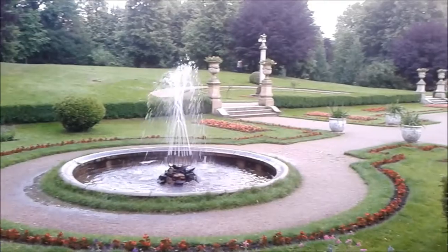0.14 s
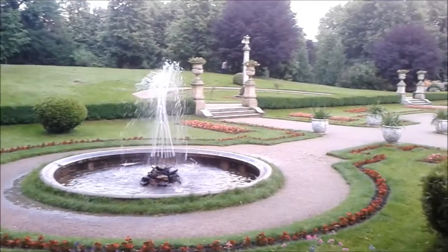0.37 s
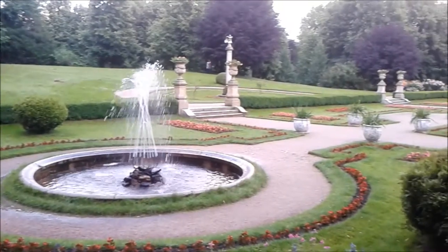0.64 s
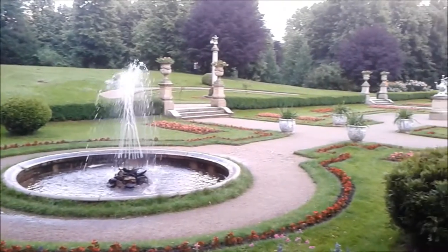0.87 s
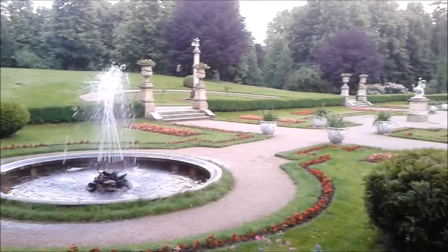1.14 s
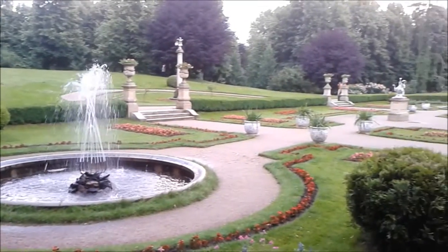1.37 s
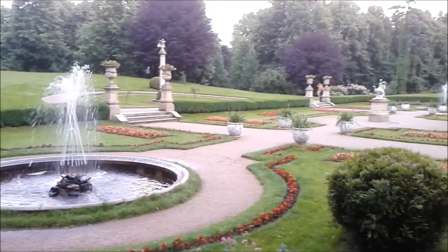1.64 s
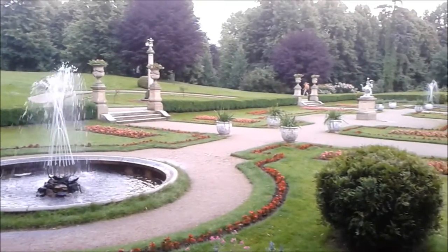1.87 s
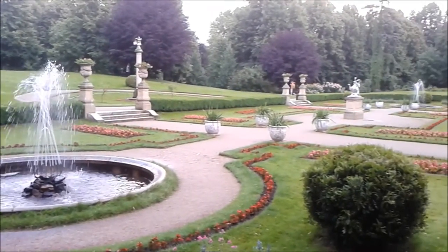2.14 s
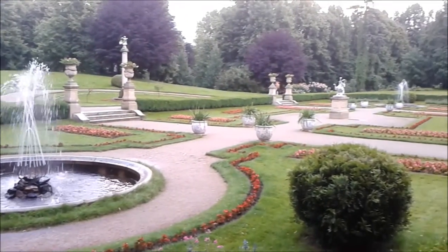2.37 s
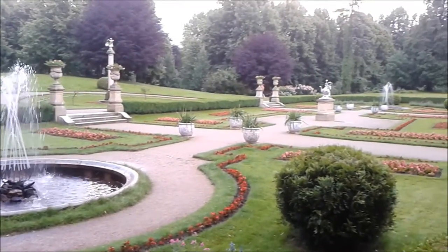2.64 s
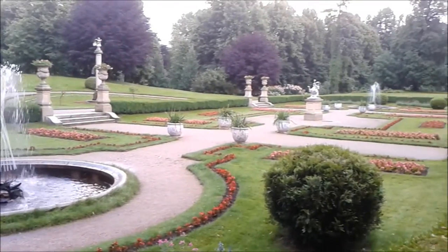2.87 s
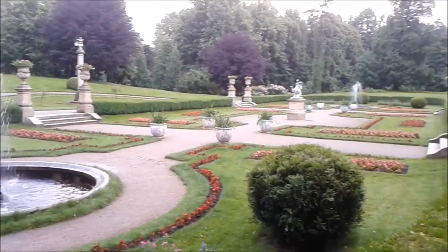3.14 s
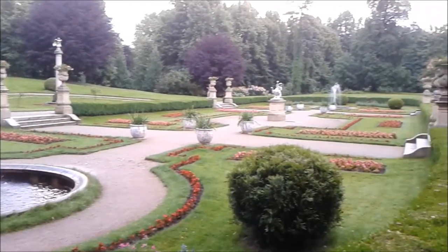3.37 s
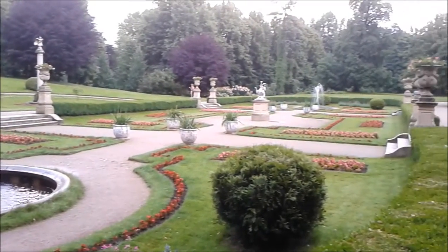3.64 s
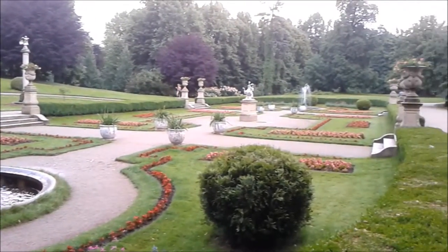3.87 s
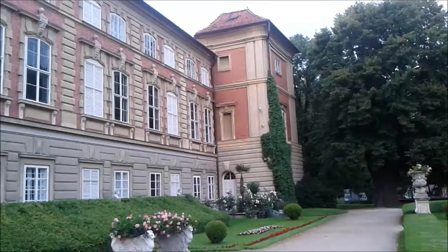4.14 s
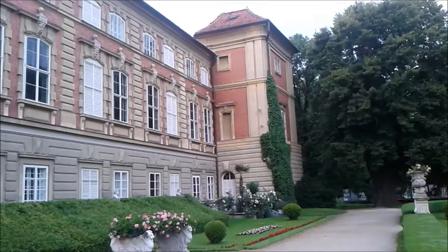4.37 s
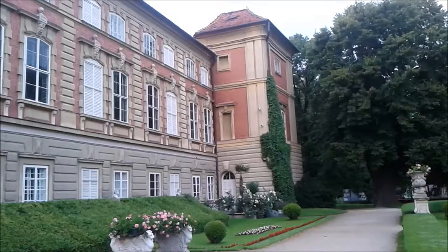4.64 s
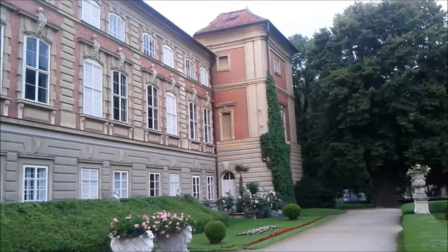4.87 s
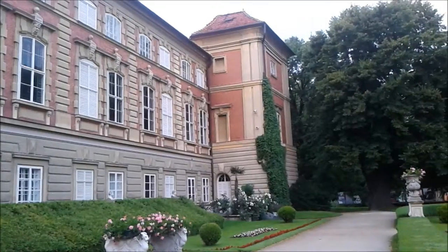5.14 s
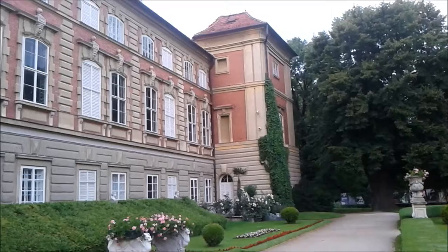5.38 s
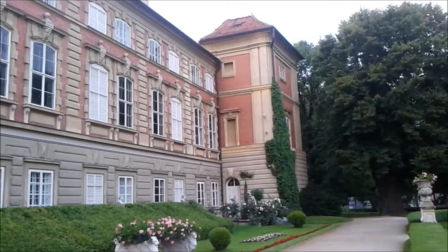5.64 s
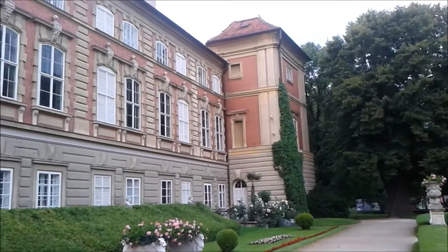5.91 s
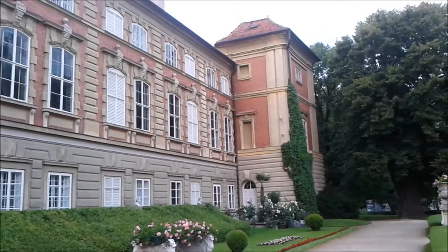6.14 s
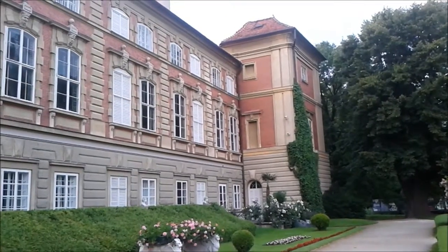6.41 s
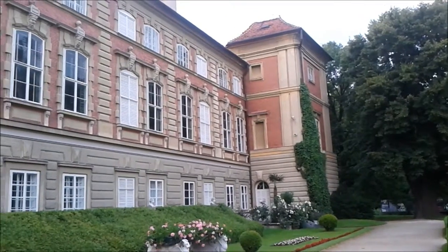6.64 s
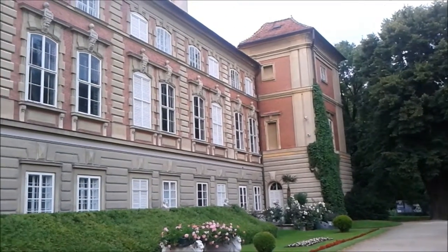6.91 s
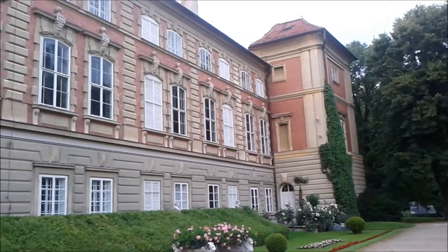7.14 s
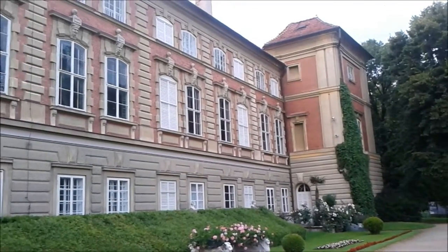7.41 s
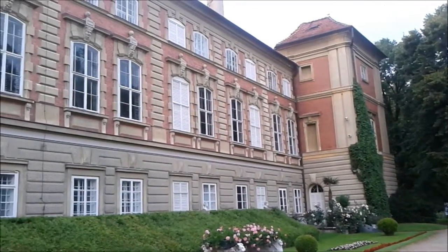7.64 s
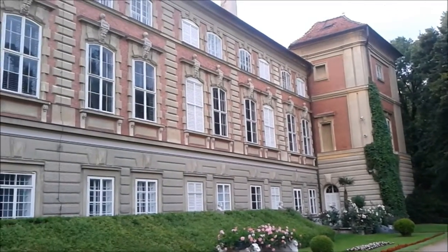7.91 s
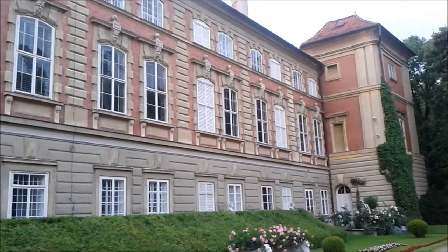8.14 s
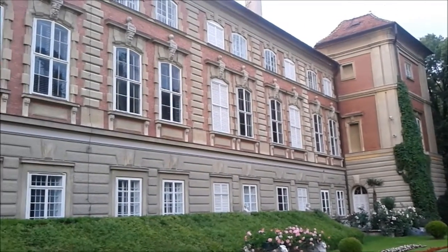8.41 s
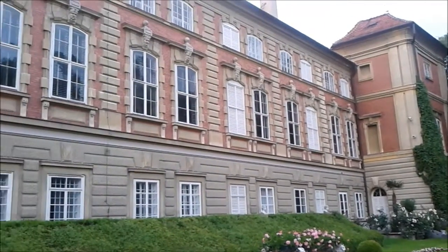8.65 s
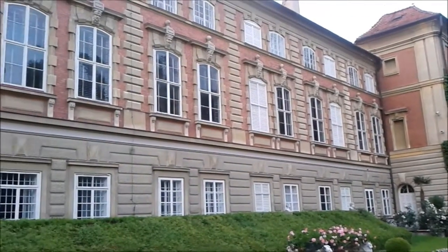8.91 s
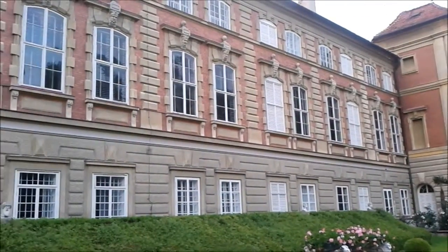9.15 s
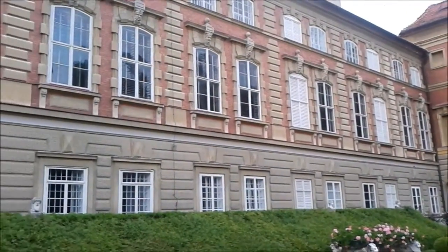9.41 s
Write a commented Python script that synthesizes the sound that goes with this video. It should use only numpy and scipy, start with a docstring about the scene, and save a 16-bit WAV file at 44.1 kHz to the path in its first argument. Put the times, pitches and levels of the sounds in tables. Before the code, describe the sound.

Close, busy fountain water hisses, plops and slaps, cuts abruptly to silence, then returns much fainter and farther away in a quiet park.

```python
"""A fountain jet falls back into its stone basin in a park. First it is heard from near while the
microphone turns away: noise for the hiss, damped sines for drops, plops, splashes and low glugs, and a few
soft hoots from wavering sines. After a short silence it is heard from far off beside a house wall: softer,
without the random stray plops, with one more hoot. A low rumble of filtered noise lies under both parts."""
import sys
import numpy as np
from scipy import signal
from scipy.fft import rfft, irfft
from scipy.io import wavfile
from scipy.ndimage import uniform_filter1d, map_coordinates

SR = 44100
rng = np.random.default_rng(int(sys.argv[2]) if len(sys.argv) > 2 else 0)


def store_wav(level_fs):
    """Save 16-bit WAV to argv[1]."""
    pcm = np.round(np.clip(np.atleast_2d(level_fs), -1, 1) * 32767)
    wavfile.write(sys.argv[1], SR, pcm.T.astype(np.int16))


def gain_from_decibels(decibels):
    """Convert decibel values to linear amplitude factors."""
    exponent = np.asarray(decibels, float) / 20
    return 10 ** exponent


N = 420273

# The near part, then the far part. Each row: start in seconds, end in seconds.
PARTS = [(0, 4.2408), (4.4381, 8.8597)]
# How far the microphone is turned away. Each row: time in seconds, turn from 0 (facing) to 1 (away).
TURN = [(0, 0), (1, 0.26), (2, 0.51), (3, 0.81), (4.24, 0.94), (4.44, 0.4), (6, 0.34), (7.5, 0.31),
        (8.1, 0.6), (8.86, 0.86)]
# Loudness of the steady fall, near and far. Each row: time in seconds, level in dB.
NEAR_LEVEL = [(0.1, -26.5), (0.41, -26), (0.53, -26.5), (0.91, -27), (1.04, -26), (1.51, -27), (2.18, -26),
              (2.57, -28), (2.85, -26), (3.71, -27), (4.05, -28), (4.24, -27)]
FAR_LEVEL = [(4.44, -36.5), (4.96, -36.5), (5.47, -35.5), (7.86, -37.5), (8.26, -37), (8.6, -38.5)]
# Colour of the water with the microphone facing it or turned away.
# Each row: frequency in Hz, relative strength per Hz in dB.
NEAR_FACING = [(120, -45.5), (200, -36.5), (407, -4), (585, -17.5), (742, -4.5), (1280, -8), (1880, 5.5),
               (2130, -2.5), (2800, 2.5), (3240, -7), (4840, 0), (6830, -2.5), (7480, -9.5), (10400, -6),
               (15500, -12)]
NEAR_TURNED = [(120, -49.5), (200, -20), (327, -15.5), (641, -16), (812, -12.5), (1170, -5.5), (1620, -6.5),
               (2090, 2.5), (2960, -7.5), (4750, -2), (6470, -8.5), (8050, -8.5), (9660, -15),
               (12700, -19.5), (15500, -24.5)]
FAR_FACING = [(120, -46.5), (200, -6), (258, -7.5), (414, -10), (462, -5), (1190, -2), (1480, -2.5),
              (1980, -6), (2420, -2.5), (2800, -4), (6710, -0.5), (9480, -10), (11000, -17.5),
              (15500, -11.5)]
FAR_TURNED = [(120, -49), (200, -16.5), (293, -5.5), (378, -13.5), (454, -4), (783, -7.5), (1620, -2),
              (1710, 0.5), (2420, -3), (3010, -8), (4580, -7.5), (5200, -7.5), (9830, -17), (15500, -25.5)]
# Cancellations at the microphone housing, which move as it turns.
# Each row: centre when facing in Hz, centre when turned in Hz, half-width in Hz, depth in dB.
NOTCHES = [(2080, 2680, 280, -3.5), (3310, 2945, 145, -9.5), (7300, 6360, 500, -7.5),
           (12500, 10100, 560, -8.5)]
# Drops against hiss, before scaling for near or far. Each row: frequency in Hz, share of the power from 0 to 1.
DROP_SHARE = [(100, 0.4), (500, 0.31), (1500, 0.54), (4000, 0.31), (12000, 0.2)]
# The heaviest splashes. Each row: start in seconds, strength in dB, pitch in Hz,
# spray relative to the strength in dB, slap relative to the strength in dB.
SPLASHES = [(0.029, -9, 2350, -28, 10.5), (0.148, -5.5, 4710, -36, -8), (0.186, -6, 2180, -15.5, 4.5),
            (0.208, -13, 6790, -24, -7), (0.264, -14.5, 2480, -27, 14), (0.288, -8.5, 1787, -33, -2),
            (0.321, -8, 1810, -32, -17), (0.441, -5.5, 1500, -18, -3.5), (0.4435, -7.5, 2000, -23.5, -11.5),
            (0.445, -0.5, 2620, -23, -8), (0.485, -7.5, 4670, -17, 3), (0.511, -8, 4920, -21.5, -1),
            (0.837, -9.5, 2000, -19.5, -16), (0.89, -13.5, 1950, -9.5, -23), (0.942, -13, 1840, -8.5, -8),
            (0.989, -6.5, 2600, -28, -10), (1.027, -15.5, 5500, -16.5, -15), (1.135, -5, 1695, -26.5, -14),
            (1.149, -8.5, 2000, -10, 3), (1.162, -7.5, 4500, -11.5, -10), (1.186, -10.5, 2000, -16.5, -6),
            (1.195, -8, 4620, -13, 3), (1.208, -9, 8500, -16.5, -19), (1.222, -5, 4575, -14, -8),
            (1.383, -11, 1720, -20.5, -2), (1.408, -13, 3990, -26, -20), (1.415, -12.5, 1780, -22, 5.5),
            (1.56, -8, 1497, -24, 11), (1.712, -10.5, 1740, -12, 2), (1.755, -1.5, 4470, -17.5, -12),
            (1.849, -4, 2135, -13, 2), (1.985, -8.5, 1670, -11.5, -11), (2.015, -14, 2010, -18, 7),
            (2.058, -8.5, 1708, -15, -2), (2.096, -9.5, 4950, -31, -25), (2.116, -8, 1910, -16.5, 10),
            (2.119, -6, 1610, -18, 5), (2.123, -3.5, 1840, -19.5, -16), (2.213, -4, 5300, -25.5, -25),
            (2.283, -8, 5080, -15.5, -19), (2.336, -11, 2000, -19, 3), (2.558, -8.5, 2070, -16, -11),
            (2.584, -7.5, 3900, -20, -2), (2.646, -11, 2040, -23.5, 9), (2.698, -14, 1850, -17, -19),
            (2.713, -13, 1900, -19.5, -3), (2.85, -3.5, 1200, -24.5, -5), (2.8528, -2, 1390, -23.5, -3),
            (2.857, -11, 1700, -21.5, -12), (2.918, -8.5, 1900, -24.5, 2), (3.1, -10.5, 4200, -20.5, -17),
            (3.246, -4, 1880, -18.5, 0), (3.36, -8, 1830, -11.5, 4.5), (3.712, -13, 2000, -17, -14),
            (3.755, -8.5, 2290, -16, -15), (3.849, -16, 2000, -21.5, 8.5), (3.916, -16.5, 2120, -20.5, -8),
            (3.977, -11, 4720, -21, -10), (4.012, -12.5, 4290, -19.5, -15),
            (4.102, -14.5, 5010, -21.5, -15), (4.145, -20, 2110, -13.5, -10),
            (4.193, -12.5, 1380, -21.5, -8), (4.567, -22.5, 2170, -14, -9), (4.77, -24, 5200, -16, 12),
            (4.785, -24.5, 6005, -10, -10), (5.083, -24.5, 5500, -14.5, -15),
            (5.172, -21.5, 6500, -17, -15), (5.267, -21.5, 7000, -14.5, -15),
            (5.823, -20, 3380, -31.5, -13), (5.987, -19, 3800, -18, -15), (6.478, -21, 1440, -13.5, 9.5),
            (6.49, -24, 2600, -21, 8), (6.552, -24.5, 1700, -20, -8), (6.563, -25, 1800, -26.5, -8),
            (6.574, -23, 1770, -26, -8), (6.584, -25, 1630, -25, -8), (6.594, -25.5, 1060, -18, -3),
            (6.602, -23.5, 5070, -14, -15), (6.664, -26, 1180, -25, -6), (6.863, -18, 6310, -30, -19),
            (6.949, -25.5, 3900, -22, -11), (6.96, -23, 3700, -23.5, -11), (6.984, -19.5, 5290, -23, -6),
            (7.509, -14, 5480, -20, -16), (8.061, -20.5, 2860, -17, -8), (8.134, -26, 1970, -20, -12),
            (8.147, -23, 1800, -17.5, 7), (8.234, -23, 1740, -24, -16), (8.254, -27.5, 2130, -22, -7),
            (8.375, -22, 2500, -21, -10), (8.4, -33, 1300, -26, -9), (8.419, -27.5, 1300, -29, -9),
            (8.519, -12, 2220, -43, -22)]
# Clear ringing bubbles, some within a splash and some between splashes.
# Each row: start in seconds, strength in dB, pitch in Hz.
PLOPS = [(0.014, -26, 1060), (0.049, -28, 890), (0.053, -23.0, 1421), (0.069, -30.0, 810),
         (0.188, -17, 1570), (0.188, -12, 6546), (0.21, -10, 6600), (0.322, -27, 6847), (0.33, -20, 2350),
         (0.411, -16, 1808), (0.424, -15, 2400), (0.442, -23, 6330), (0.512, -16.0, 4800),
         (0.89, -16, 1860), (0.892, -12, 2680), (1.085, -17, 2540), (1.134, -19.0, 4478),
         (1.137, -13, 2460), (1.156, -26, 1205), (1.171, -16, 4134), (1.197, -23, 4100), (1.208, -14, 6287),
         (1.225, -19.0, 2600), (1.281, -13, 5370), (1.407, -20, 4091), (1.414, -24, 1162),
         (1.533, -19.5, 1530), (1.559, -20, 1162), (1.597, -21, 2540), (1.712, -13, 4823),
         (1.755, -8, 5500), (1.77, -27, 1110), (1.792, -26, 6976), (1.846, -19.0, 4780), (1.85, -19, 3940),
         (1.903, -28, 1076), (1.909, -25.5, 980), (1.986, -8, 2700), (2.052, -15, 4263),
         (2.058, -18.0, 2560), (2.059, -24.0, 6330), (2.097, -18, 5469), (2.119, -21, 5470),
         (2.121, 0.5, 1804), (2.122, -6.5, 4260), (2.13, -9, 2627), (2.137, -27, 3220),
         (2.163, -27.0, 1088), (2.171, -18, 2000), (2.173, -16, 2840), (2.213, -15.0, 4860),
         (2.241, -15, 3789), (2.261, -28, 1270), (2.284, -12, 5300), (2.314, -18, 2799),
         (2.337, -20.0, 3850), (2.348, -25.0, 1162), (2.382, -23.0, 2170), (2.575, -24, 1190),
         (2.591, -20, 2282), (2.647, -19, 5297), (2.853, -29, 3760), (2.874, -15, 5770),
         (2.989, -24.5, 954), (3.068, -28.0, 3402), (3.082, -18, 3140), (3.082, -17.0, 4435),
         (3.083, -17.0, 5081), (3.182, -25, 1000), (3.354, -15, 5770), (3.36, -21, 3962),
         (3.518, -20, 5555), (3.959, -25.0, 1205), (3.979, -20.0, 5383), (4.02, -23.0, 1200),
         (4.201, -24.0, 1550), (4.605, -23, 6890), (5.081, -31, 2454), (5.775, -26, 6847),
         (5.834, -31.0, 3229), (5.85, -29, 2660), (5.974, -27, 3531), (6.063, -23, 6287),
         (6.122, -26, 6115), (6.644, -23, 6373), (7.481, -28, 4392), (7.947, -32, 5211), (8.064, -30, 2540),
         (8.147, -34.0, 2971), (8.519, -29.0, 3316)]
# The biggest bubbles. Each row: start in seconds, strength in dB, pitch in Hz.
GLUGS = [(0.432, -34, 334), (0.505, -31.5, 496), (2.489, -29, 295), (2.755, -31, 330), (2.91, -33, 476),
         (3.17, -26, 331), (3.445, -34, 490), (4.096, -31, 316), (4.135, -32, 352), (4.576, -35.5, 510),
         (6.128, -31, 253), (6.733, -37, 241), (6.78, -36, 269), (7.176, -35, 510), (8.468, -37, 286)]
# Low soft notes, perhaps a distant bird.
# Each row: start in seconds, length in seconds, strength in dB, pitch in Hz.
HOOTS = [(0.134, 0.088, -46, 400), (1.328, 0.096, -40, 405), (1.804, .1, -38, 411), (7.635, 0.15, -46, 458)]
# Colour of the rumble. Each row: frequency in Hz, relative strength per Hz in dB.
RUMBLE = [(15, -53.5), (25, -17.5), (54, -4.5), (91, -8), (146, -8), (177, -9.5), (260, 0), (340, -30),
          (570, -120)]

SLUG_S, SLAP_HZ = 0.0065, 1026  # time scale of the break-up, middle pitch of the slap
SPRAY_RISE_S, SPRAY_T60_S = 0.0078, 0.02  # times for a 60 dB rise and a 60 dB fall
SNAP_DETUNE, SNAP_SIZE = 1.8, 0.4  # the snap's place on the pitch and size scales of a volley
SMALL_OVER_DB, SMALL_SPREAD_DB = 2, 5  # lesser splashes: least strength over the fall, range
SMALL_SPRAY_DB, SMALL_SLAP_DB = -17, -11  # relative to their strength
SMALL_LOW_HZ, SMALL_HIGH_HZ = 2000, 4740  # they ring around one of two pitches
PLOP_SWELL_CYCLES, PLOP_RING_CYCLES = 3.3, 26  # cycles to full swell, cycles for a 60 dB fall
STRAY_OVER_DB, STRAY_SPREAD_DB = -6.5, 5.5  # random plops: least strength against the fall, range
STRAY_LOW_HZ, STRAY_HIGH_HZ = 952, 2907
GLUG_T60_S = 0.076  # time for a 60 dB fall
LESSER_DB, LESSER_SPREAD_DB = -35.5, -2.5  # random glugs: greatest strength, range downwards
LESSER_LOW_HZ, LESSER_HIGH_HZ = 264, 542
RUMBLE_DB, RUMBLE_FAR_DB = -61.5, -1.5  # level before the swell; the house wall shelters the far spot


def unit(x):
    """Scales a sound to an average (rms) strength of 1."""
    return x / np.sqrt(np.mean(np.abs(x) ** 2) + 1e-20)


def along(points, hz):
    """Reads a curve of (Hz, value) points along a logarithmic frequency axis."""
    f, v = np.transpose(points)
    return np.interp(np.log(hz + 1), np.log(f + 1), v)


def wobble(rate):
    """Draws a smooth random curve through a given number of random points a second."""
    points = rng.standard_normal(int(N * rate / SR) + 4)
    return map_coordinates(points, [np.arange(N) * rate / SR])


def passed(x, hz, kind):
    """Filters out what lies beyond a corner frequency (third-order Butterworth)."""
    return signal.sosfilt(signal.butter(3, hz, kind, fs=SR, output="sos"), x)


def flat(z):
    """Evens out a short-time spectrum to about the same mean power at every frequency."""
    power = np.mean(np.abs(z) ** 2, 1)
    return z / np.sqrt(uniform_filter1d(power, size=5))[:, None]


def bubbles(s, hz, t60, size, rise, span, swell_cycles=2):
    """Adds damped sines that swell over a few cycles and climb in pitch as each bubble nears the surface."""
    t = np.arange(span) / SR
    hz = hz[:, None]
    age = t / t60[:, None]
    swell = np.sin(np.pi / 2 * np.minimum(hz * t / swell_cycles, 1)) ** 2
    tone = np.sin(2 * np.pi * hz * t * (1 + rise * np.minimum(age, 1)))
    wave = size[:, None] * swell * gain_from_decibels(-60 * age) * tone
    at = np.clip(np.round(s * SR).astype(int), 0, N)[:, None] + np.arange(span)
    return np.bincount(at.ravel(), wave.ravel(), N + span)[:N]


def fall(facing, turned, notches, granular):
    """The steady fall at rms 1: hiss and drops, coloured by the way the microphone points."""
    hiss = rng.standard_normal(N) * gain_from_decibels(0.9 * wobble(13) + 0.77 * wobble(60))
    hz, t, smooth = signal.stft(hiss, SR, nperseg=512)
    patter = drops(count=22000, cycles=9.2, spread_db=6.0)
    grains = signal.stft(patter, SR, nperseg=512)[2]
    share = np.clip(granular * along(DROP_SHARE, hz), 0, 1)[:, None]
    water = np.sqrt(1 - share) * flat(smooth) + np.sqrt(share) * flat(grains)
    # random flicker, smoothed over neighbouring frequencies and moments
    flicker = uniform_filter1d(rng.standard_normal(water.shape), size=6, axis=0)
    flicker = uniform_filter1d(flicker, size=5, axis=1)
    turn = turned_away(t)
    colour_db = np.outer(along(facing, hz), 1 - turn) + np.outer(along(turned, hz), turn)
    colour = gain_from_decibels(colour_db + housing_db(hz, t, notches))
    colour /= np.sqrt(np.mean(colour ** 2, 0))  # turning changes the colour, the level curve the loudness
    out = signal.istft(water * colour * gain_from_decibels(1.2 * unit(flicker)), SR, nperseg=512)[1][:N]
    return unit(out)


def drops(count, cycles, spread_db):
    """Random drops of every size, each ringing a few cycles; their strength gathers in clumps."""
    when, pitch, size = rng.random((count, 3)).T
    hz = 300 * 50 ** pitch
    size_db = np.minimum(-spread_db * np.log(1 - size), 10)  # many small drops, few big ones
    patter = bubbles(when * N / SR, hz, cycles / hz, gain_from_decibels(size_db), rise=0.28, span=200)
    return patter * gain_from_decibels(0.6 * wobble(9) + 1.1 * wobble(35) + 2.2 * wobble(120))


def fall_db(t):
    """Level of the fall at time t, near in the first part and far in the second."""
    return np.interp(t, *np.transpose(NEAR_LEVEL + FAR_LEVEL))


def turned_away(t):
    """How far the microphone is turned away at time t, from 0 to 1."""
    return np.clip(np.interp(t, *np.transpose(TURN)), 0, 1)


def housing_db(hz, t, notches):
    """Gain of the housing's cancellations, whose centres slide as the microphone turns."""
    turn = turned_away(t)
    total_db = 0
    for facing_hz, turned_hz, width, depth_db in notches:
        centre = facing_hz + (turned_hz - facing_hz) * turn
        total_db = total_db + depth_db / (1 + ((hz[:, None] - centre) / width) ** 2)
    return total_db


def housed(x):
    """Passes a sound of the near part through the same cancellations as the fall."""
    hz, t, z = signal.stft(x, SR, nperseg=256)
    gain_db = housing_db(hz, t, NOTCHES) * (t < PARTS[0][1])
    return signal.istft(z * gain_from_decibels(gain_db), SR, nperseg=256)[1][:N]


def splashes(water, rows, count):
    """Slugs of water break up on landing: bubbles near one pitch, a slap, and fine fall flaring as spray."""
    s, db, hz, spray_db, slap_db = np.repeat(rows, count, 0).T
    late, detune, size = rng.random((len(s), 3)).T
    late = 1.6 * late - 0.45  # some water arrives ahead of the slug
    # the slug's own bubble is the biggest (a lower size value is louder)
    late[::count], detune[::count], size[::count] = 0, 0.5, -1.3
    # a small bright bubble snaps off with it
    late[1::count], detune[1::count], size[1::count] = 0.03, SNAP_DETUNE, SNAP_SIZE
    deep = np.arange(len(s)) % count > 5  # the last bubbles of each volley make the slap
    pitch = np.where(deep, SLAP_HZ, hz) * 1.345 ** (2 * detune - 1)
    peak_db = db - 1.87 + deep * slap_db - 7 * np.abs(late) - 6 * size
    t60 = np.where(deep, 8, 13) / pitch
    volley = bubbles(s + late * SLUG_S, pitch, t60, gain_from_decibels(peak_db), rise=0.03, span=900, swell_cycles=2.27)
    ringing = passed(passed(housed(volley), 640, "high"), 640, "high")

    t = np.arange(-400, 1500) / SR
    shape = gain_from_decibels(-60 * np.where(t < 0, -t / SPRAY_RISE_S, t / SPRAY_T60_S))
    at = np.round(rows[:, 0] * SR).astype(int)
    starts = np.bincount(at, gain_from_decibels(rows[:, 1] + rows[:, 3]), N + 1)
    flare = signal.fftconvolve(starts, shape)[400:400 + N]  # skip the 400 samples of rise
    return ringing + flare * unit(passed(water, 1300, "high"))


def small_splashes(count):
    """Rows for lesser slugs that land at random, a little above the steady fall."""
    when, size, kind, detune = rng.random((count, 4)).T
    s = when * N / SR
    db = fall_db(s) + SMALL_OVER_DB + SMALL_SPREAD_DB * size
    hz = np.where(kind < 0.55, SMALL_LOW_HZ, SMALL_HIGH_HZ) * 1.35 ** (2 * detune - 1)
    return np.transpose([s, db, hz, np.full(count, SMALL_SPRAY_DB), np.full(count, SMALL_SLAP_DB)])


def plops(count):
    """Clear bubbles, within and between splashes, ring for more cycles; random ones reach only the near spot."""
    when, size, pitch = rng.random((count, 3)).T
    when = when * PARTS[0][1]
    stray_db = fall_db(when) + STRAY_OVER_DB + STRAY_SPREAD_DB * size
    stray_hz = STRAY_LOW_HZ * (STRAY_HIGH_HZ / STRAY_LOW_HZ) ** pitch
    s, db, hz = np.hstack([np.transpose(PLOPS), [when, stray_db, stray_hz]])
    lost_db = 60 * PLOP_SWELL_CYCLES / PLOP_RING_CYCLES  # make up for what dies away during the swell
    ringing = bubbles(s, hz, PLOP_RING_CYCLES / hz, gain_from_decibels(db + lost_db), rise=0.11, span=1600,
                      swell_cycles=PLOP_SWELL_CYCLES)
    return housed(ringing)


def glugs(count):
    """Large pockets of air ring low under the surface: the biggest, and lesser ones at random."""
    when, size, pitch = rng.random((count, 3)).T
    lesser_db = LESSER_DB + LESSER_SPREAD_DB * size
    lesser_hz = LESSER_LOW_HZ * (LESSER_HIGH_HZ / LESSER_LOW_HZ) ** pitch
    s, db, hz = np.hstack([np.transpose(GLUGS), [when * N / SR, lesser_db, lesser_hz]])
    ringing = bubbles(s, hz, np.full(len(s), GLUG_T60_S), gain_from_decibels(db), rise=0.056, span=6000)
    return passed(ringing, 169.4, "high")


def hoots():
    """Each note is a sine that swells and fades on a wavering, husky pitch."""
    t = np.arange(N) / SR
    waver, husk = 1.9 * wobble(35), gain_from_decibels(2.6 * wobble(45))
    notes = np.zeros(N)
    for s, length, db, hz in HOOTS:
        swell = np.sin(np.pi * np.clip((t - s) / length, 0, 1)) ** 0.7
        notes += gain_from_decibels(db) * swell * np.sin(2 * np.pi * hz * t + waver)
    return husk * notes


def park():
    """Low rumble of the air and distant town: coloured noise, swelling a little."""
    hz, t, z = signal.stft(rng.standard_normal(N), SR, nperseg=4096)
    rumble = signal.istft(z * gain_from_decibels(along(RUMBLE, hz))[:, None], SR, nperseg=4096)[1][:N]
    is_far = np.arange(N) > PARTS[0][1] * SR
    swell_db = 3 * wobble(4.3)
    return gain_from_decibels(RUMBLE_DB + RUMBLE_FAR_DB * is_far + swell_db) * unit(rumble)


def scene():
    """Near fall in the first part, far fall in the second, with all the other sounds added."""
    t = np.arange(N) / SR
    near = fall(NEAR_FACING, NEAR_TURNED, NOTCHES, granular=1.19)
    far = fall(FAR_FACING, FAR_TURNED, [], granular=0.446)
    water = np.where(t < PARTS[0][1], near, far)
    slugs = np.vstack([SPLASHES, small_splashes(count=130)])
    mix = gain_from_decibels(fall_db(t)) * water + splashes(water, slugs, count=9)
    mix = mix + plops(count=400) + glugs(count=14) + hoots() + park()
    return mix[None]


def top_cut(x):
    """Nothing passes above the cut-off."""
    return signal.sosfilt(signal.butter(12, 16530, fs=SR, output="sos"), x)


def record(dry):
    """Soft overload, a treble limit, and hard cuts to silence around the two parts."""
    t = np.arange(N) / SR
    running = sum((t >= a) & (t < b) for a, b in PARTS)
    dry = dry / (1 + np.abs(dry / 1.05) ** 6) ** (1 / 6)  # the loudest peaks round off near full scale
    spectrum = rfft(dry * running)
    heard = irfft(spectrum * (np.fft.rfftfreq(N, 1 / SR) < 15800), N)  # nothing from 15800 Hz up
    return top_cut(heard * running)


dry = scene()
out = record(dry)
store_wav(out)
```